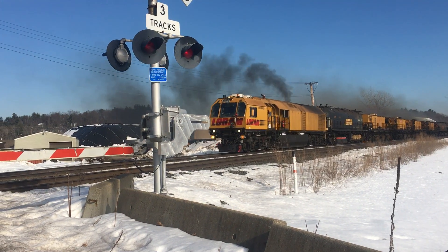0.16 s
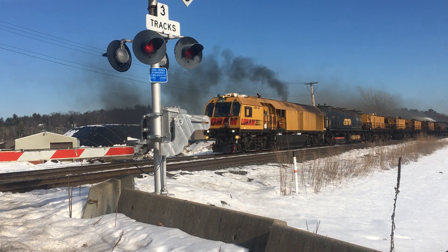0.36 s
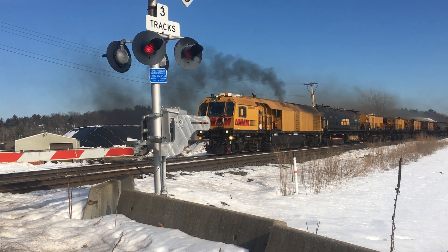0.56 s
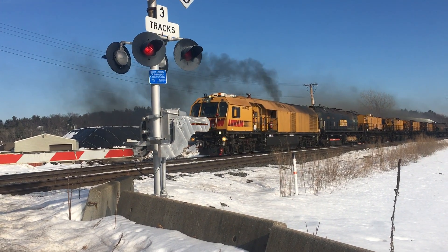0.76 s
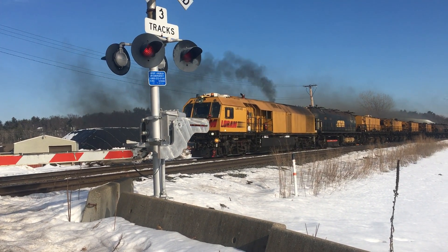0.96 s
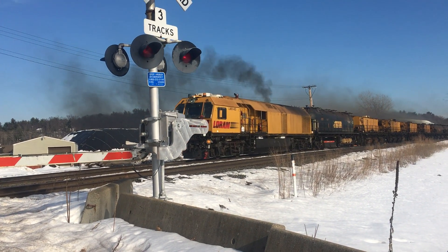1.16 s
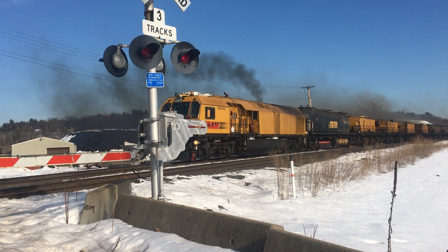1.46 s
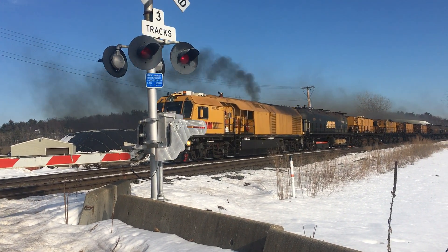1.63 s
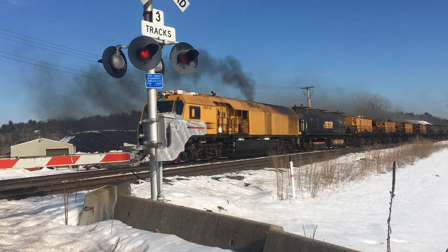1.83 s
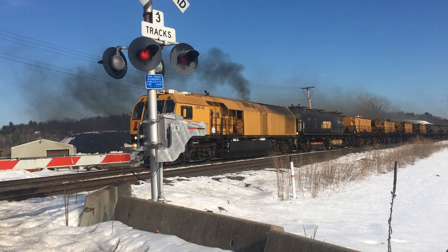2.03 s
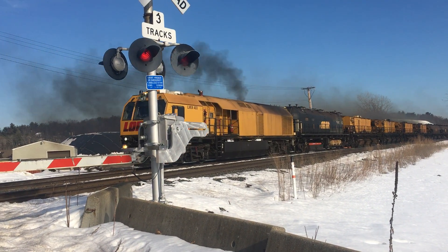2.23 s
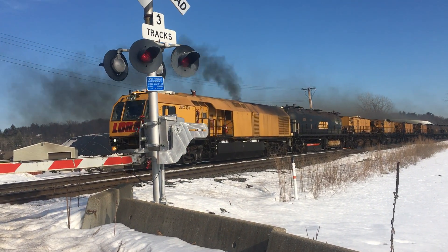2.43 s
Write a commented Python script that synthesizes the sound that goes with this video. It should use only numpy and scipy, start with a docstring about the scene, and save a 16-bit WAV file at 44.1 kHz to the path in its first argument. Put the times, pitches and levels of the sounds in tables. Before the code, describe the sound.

Outdoors by a rail crossing, a sustained air horn chord dominates the first half, stops suddenly and echoes off distant woods, then the approaching diesel engine chugs louder with clattering machinery and a few hard knocks.

```python
"""Work train with air horn

A diesel work train nears a road crossing across open snow, sounding a three-chime air horn.
The horn is a stack of sine overtones; it shuts off and leaves an echo and a dull tail from the woods.
Then the lumpy twelve-cylinder engine swells: filtered pulses make its exhaust throb, and shaped noise
makes the roar of machinery and wheels, with a bark once per engine cycle and four hard knocks."""
import sys
import numpy as np
from scipy import signal
from scipy.fft import rfft, irfft
from scipy.io import wavfile
from scipy.ndimage import uniform_filter1d, map_coordinates

SR = 44100
rng = np.random.default_rng(int(sys.argv[2]) if len(sys.argv) > 2 else 0)


def master_out(mix):
    """Clip the mix to full scale and print it as 16-bit PCM to the path in sys.argv[1]."""
    frames = np.transpose(np.atleast_2d(mix))
    ceiling = np.clip(frames, -1, 1)
    pcm = np.round(ceiling * 32767).astype(np.int16)
    wavfile.write(sys.argv[1], SR, pcm)


N = 114219  # length in samples

# Base pitch of the low, middle and high chime [f/Hz]
CHIME_HZ = [311.05, 364.0, 486.85]
# Trim of each chime [level/dB, extra level of its higher overtones/dB]
CHIME_TRIM = [(0, -2.5), (0, -2.5), (0, -6.5)]
# Lower overtones before the other level changes [harmonic number, low, middle, high chime: level/dB]
LOW_OVERTONES = [(1, -43.5, -40, -35.5), (2, -31.5, -30, -25), (3, -25, -32, -23.5), (4, -25.5, -33.5, -31),
                 (5, -25.5, -37.5, -50.5), (6, -32, -47.5, -53), (7, -44, -66, -50), (8, -53, -65.5, -53.5),
                 (9, -58.5, -55.5, -51.5), (10, -48, -56.5, -64.5), (11, -49, -54, -65.5),
                 (12, -51.5, -56.5, -68), (13, -48, -61, -67.5), (14, -46.5, -75, -74.5)]
# Higher overtones, shared by the chimes, before the other level changes [f/Hz, level/dB]
HIGH_OVERTONES = [(4900, -52), (5300, -79.5), (6300, -66.5), (7000, -73.5), (7400, -78), (7800, -79),
                  (8300, -76.5), (10000, -75.5), (12000, -83.5), (15500, -102)]
# Loudness of the whole horn over time [t/s, level/dB]
HORN_LEVEL = [(0, -2), (.3, 1), (.5, -0.5), (.65, -2), (.88, -2.5), (1.0, -1.5), (1.15, -1.5), (1.3, -1.5)]
# Treble of the horn over time, as heard at 8 kHz [t/s, level/dB]
HORN_TREBLE = [(0, 5.5), (.27, -4), (.48, 3.5), (.62, 4.5), (.75, 3.5), (1.0, -1), (1.16, 2), (1.26, -5.5),
               (1.3, -3.5)]
# Steady change in level of parts of the chord as the train moves [f/Hz, change/(dB per s)]
COLOUR_DRIFT = [(364, -2.5), (487, 5), (622, -4.5), (728, 4.5), (933, 0.5), (974, -2.5), (1092, 4),
                (1244, 1.5), (1460, -1), (1820, 4), (1948, 5), (2500, 0.5)]
# Colour of the horn's rushing air [f/Hz, relative level/dB]
AIR_COLOUR = [(250, -7.5), (450, -10), (850, -12.5), (1100, -3), (1500, 6), (1950, -3), (2350, -19),
              (2700, -23.5), (3100, -14), (4400, -18), (5200, -27.5), (6800, -30.5), (7600, -47),
              (9500, -38.5), (15500, -54)]
# Colour of the near echo [f/Hz, relative level/dB]
ECHO_COLOUR = [(200, -3.5), (350, 1), (700, -12), (1000, -1.5), (1400, -4.5), (2000, 9), (2700, 11),
               (4000, 0), (6500, 13), (9000, 1), (15000, -14)]
# Colour of the tail from the woods [f/Hz, relative level/dB]
TAIL_COLOUR = [(300, -8), (490, 0.5), (620, 2.5), (730, -6.5), (930, -7), (980, 1), (1250, -11.5),
               (1950, -15), (4000, -19.5)]
# Strength of the twelve cylinders in firing order [relative level/dB]
CYLINDER_DB = [1.5, -6.5, 4.5, -2.5, -34.5, -11, 0, -26.5, -6.5, -8, -6.5, -1.5]
# How the exhaust pipe colours the firing pulses [f/Hz, relative level/dB]
PIPE_COLOUR = [(12, -37.5), (30, -7), (45, 7), (62, 7.5), (90, 2), (120, -25.5), (136, -2.5), (165, -28),
               (182, -21.5), (215, -18), (290, -21), (364, -26.5), (520, -48.5), (1000, -64)]
# Colour of the turbulent exhaust rumble [f/Hz, relative level/dB]
RUMBLE_COLOUR = [(15, -1), (26, 6), (40, 13.5), (70, 12), (150, -8), (300, -37)]
# Exhaust over time [t/s, level/dB]
EXHAUST_LEVEL = [(0, -41.5), (.7, -39.5), (1.1, -37.5), (1.42, -36), (1.6, -30), (1.8, -25.5), (2.05, -21),
                 (2.3, -20.5), (2.59, -21)]
# Hard knocks of the engine [t/s, level/dB]
KNOCKS = [(1.961, -29), (2.0235, -14), (2.29, -24), (2.355, -24)]
# Colour of a knock [f/Hz, relative level/dB]
KNOCK_COLOUR = [(500, -10), (1000, -3), (1300, 0), (1900, -5), (2500, -30), (4300, -27), (5500, -46),
                (8000, -62)]
# Machinery and wheel roar over time [t/s, level/dB]
ROAR_LEVEL = [(0, -47.5), (1.2, -44.5), (1.46, -39), (1.6, -31.5), (1.75, -30), (2.0, -24.5), (2.25, -25),
              (2.59, -24)]
# Colour of the roar [f/Hz, relative level/dB]
ROAR_COLOUR = [(90, 3.5), (180, 5), (290, -5.5), (365, 1.5), (470, -4), (620, 2), (790, -6), (1100, 2),
               (1400, -1), (1900, -4.5), (2250, -17.5), (2650, -28.5), (3200, -23), (4400, -22),
               (5200, -37.5), (6800, -38), (7600, -51), (8700, -46), (11000, -52), (15500, -56)]

# Horn shut-off: the sound drops at a base rate, plus more for each kHz, and the treble starts earlier
SHUT_S, RELEASE_DB_PER_S, DULL_DB_PER_S_KHZ = 1.298, 307, 40.5
TREBLE_LEAD_S_PER_KHZ = 0.0052
# Pitch changes as shares of the pitch: the train turning slightly abeam, sag after shut-off, waver
DOPPLER_PER_S, SAG_PER_S, WAVER = -0.0007, 0.032, .0005
JITTER_S = 3.5e-6  # each reed opens a little early or late; this roughens the top
RASP_DB = -24  # phase flutter at 1 kHz, in dB relative to 1 radian
TOP_RASP = 2.5  # extra flutter factor for each kHz above 7 kHz
FADING_DB, TREBLE_FADING_DB = 1.34, 2  # random level changes: everywhere, and added at 8 kHz
BUZZ_HZ, BUZZ_SCATTER = 2515, 0.1  # above this, phases scatter by only 0.1 turn: a brassy buzz
AIR_DB = -32
CREST_HZ, CREST_S, CREST_POWER = 7350, 0.008, 2  # where the flare begins, averaging time, strength
ECHO_S, ECHO_DB = .1, -14  # level relative to the horn
TAIL_DB, TAIL_T60_S = -18, 2.0  # level relative to the horn, time to fade by 60 dB
TAIL_SHIFT = .014  # the woods lie abeam and hear the train this share flatter
CYCLE_HZ, BEAT_S = 15.15, 2.0225  # engine cycles per second, and the start of one cycle
SCATTER_DB = .6  # random spread in firing strength
RUMBLE_DB = -17  # relative to the firing pulses
KNOCK_RISE_S, KNOCK_S = .0007, .0025
BARK_LAG_S, BARK_S, BARK_DB = .0035, .006, 4.2
CLATTER_DB = 1.12
HISS_HZ, HISS_SLOPE = 2500, 0.077  # the treble gains this many dB more per dB of roar
TOP_HZ = 15700  # upper limit of the sound


def undb(db):
    """Turn decibels into gain."""
    return 10 ** (np.asarray(db) / 20)


def unit(x):
    """Scale to an rms (average strength) of 1."""
    return x / np.sqrt(np.mean(x ** 2))


def curve(table, at):
    """Read a table by drawing straight lines between its rows."""
    return np.interp(at, *np.array(table, float).T)


def colour(x, table):
    """Filter by a table of f/Hz and level/dB, falling away beyond both ends; rms 1."""
    hz, db = np.array(table, float).T
    log_hz = np.log(np.arange(N + 1) * SR / (2 * N) + 1)
    outside = np.abs(log_hz - np.clip(log_hz, np.log(hz[0]), np.log(hz[-1])))
    gain = undb(np.interp(log_hz, np.log(hz), db)) * np.exp(-2 * outside)
    return unit(irfft(rfft(x, 2 * N) * gain)[:N])


def noise(table):
    """Make coloured noise with rms 1."""
    return colour(rng.standard_normal(N), table)


def lowpass(x, hz):
    """Gently remove treble with a second-order filter."""
    return signal.sosfilt(signal.butter(2, hz, fs=SR, output="sos"), x)


def walk(rate):
    """Drift smoothly at random, rate steps per second, with spread near 1."""
    k = max(int(SR / rate), 2)
    steps = np.repeat(rng.standard_normal(N // k + 4), k)
    smooth = uniform_filter1d(uniform_filter1d(steps, k), k)
    return smooth[k:k + N] * np.sqrt(2)


def horn(t):
    """Three reeds, rich in harmonics that fade in the air; as the valve shuts they sag, treble first."""
    shut = np.maximum(t - SHUT_S, 0)
    from_middle = t - SHUT_S / 2
    treble = curve(HORN_TREBLE, t)
    chord = 0
    for c, (hz, (chime_db, high_db)) in enumerate(zip(CHIME_HZ, CHIME_TRIM)):
        bend = 1 + DOPPLER_PER_S * from_middle - SAG_PER_S * shut + WAVER * walk(25)
        phase = 2 * np.pi * (np.cumsum(hz * bend) / SR + hz * JITTER_S * walk(hz))
        flutter = undb(RASP_DB) * walk(160)
        for k in range(1, int(TOP_HZ / hz)):
            overtone_hz = k * hz
            khz = overtone_hz / 1000
            high = min(khz / 8, 1.5)  # how strongly treble changes apply
            if k <= len(LOW_OVERTONES):
                base = LOW_OVERTONES[k - 1][c + 1]
            else:
                base = curve(HIGH_OVERTONES, overtone_hz) + high_db
            fading = (FADING_DB + TREBLE_FADING_DB * high) * walk(6.12)
            drift = curve(COLOUR_DRIFT, overtone_hz) * from_middle
            since_release = np.maximum(t - SHUT_S + TREBLE_LEAD_S_PER_KHZ * khz, 0)
            release = since_release * (RELEASE_DB_PER_S + DULL_DB_PER_S_KHZ * khz)
            level = base + chime_db + fading + drift + treble * high - release
            scatter = BUZZ_SCATTER if overtone_hz > BUZZ_HZ else 1
            offset = 2 * np.pi * rng.random() * scatter
            rasp = flutter * (np.sqrt(khz) + TOP_RASP * max(khz - 7, 0))
            # The root of 2 turns an rms level into a sine's peak
            chord = chord + np.sqrt(2) * undb(level) * np.sin(k * phase + rasp + offset)
    air = noise(AIR_COLOUR) * undb(AIR_DB - shut * RELEASE_DB_PER_S)
    return (chord + air) * undb(curve(HORN_LEVEL, t))


def flare(x):
    """Loud crests of the beating chord steepen, so the very top comes in rapid pulses."""
    swell = np.sqrt(np.abs(uniform_filter1d(x ** 2, int(CREST_S * SR))))
    swell = swell / swell[:int(SHUT_S * SR)].mean()
    body = signal.sosfiltfilt(signal.butter(6, CREST_HZ, fs=SR, output="sos"), x)
    return body + (x - body) * swell ** CREST_POWER


def landscape(x, t):
    """One bright echo from close by, and a dull, slightly flat tail from the woods."""
    delayed = map_coordinates(x, [(t - ECHO_S) * SR], order=3, mode="mirror")
    echo = colour(delayed, ECHO_COLOUR)
    # Reading the horn more slowly lowers its pitch
    flat = map_coordinates(x, [(t - TAIL_SHIFT * (t - SHUT_S)) * SR], order=1, mode="mirror")
    woods = noise(TAIL_COLOUR) * np.exp(-np.log(1000) * t / TAIL_T60_S)
    tail = unit(signal.fftconvolve(flat, woods)[:N])
    return x.std() * (undb(ECHO_DB) * echo + undb(TAIL_DB) * tail)


def exhaust(t):
    """Unequal firings throb through the pipe, with some turbulent rumble."""
    count = len(CYLINDER_DB)
    firing = np.floor((t - BEAT_S) * CYCLE_HZ * count).astype(int)
    at = np.flatnonzero(np.diff(firing)) + 1  # samples where a cylinder fires
    strength_db = np.array(CYLINDER_DB)[firing[at] % count]
    pulses = np.zeros(N)
    pulses[at] = undb(strength_db + SCATTER_DB * rng.standard_normal(len(at)))
    throb = colour(pulses - pulses.mean(), PIPE_COLOUR)
    rumble = undb(RUMBLE_DB) * noise(RUMBLE_COLOUR)
    return (throb + rumble) * undb(curve(EXHAUST_LEVEL, t))


def knocks(t):
    """Short hard engine knocks: noise that rises sharply and dies away at set times."""
    envelope = 0
    for start, db in KNOCKS:
        fade = np.exp(-np.abs(t - start) / KNOCK_S)
        rise = np.exp(np.minimum(t - start, 0) / KNOCK_RISE_S)
        envelope = envelope + undb(db) * fade * rise
    return envelope * noise(KNOCK_COLOUR)


def roar(t):
    """Clattering machinery and wheels with a bark each engine cycle; brighter as they near."""
    cycles = (t - BEAT_S - BARK_LAG_S) * CYCLE_HZ
    from_bark = ((cycles + .5) % 1 - .5) / CYCLE_HZ  # seconds from the nearest bark
    bark = BARK_DB * np.exp(-(from_bark / BARK_S) ** 2)
    sound = unit(noise(ROAR_COLOUR) * undb(bark + CLATTER_DB * walk(300)))
    db = curve(ROAR_LEVEL, t)
    # Filtering forwards and backwards keeps the timing
    body = lowpass(lowpass(sound, HISS_HZ)[::-1], HISS_HZ)[::-1]
    hiss = (sound - body) * undb(HISS_SLOPE * (db - db.max()))
    return (body + hiss) * undb(db)


def scene():
    """Add the horn with its echoes to the approaching engine."""
    t = np.arange(N) / SR
    blast = flare(horn(t))
    engine = exhaust(t) + knocks(t) + roar(t)
    return (blast + landscape(blast, t) + engine)[None]


def record(dry):
    """The recorder cuts the top with a steep low-pass filter."""
    return signal.sosfilt(signal.ellip(10, .2, 80, TOP_HZ, fs=SR, output="sos"), dry)


dry = scene()
out = record(dry)
master_out(out)
```